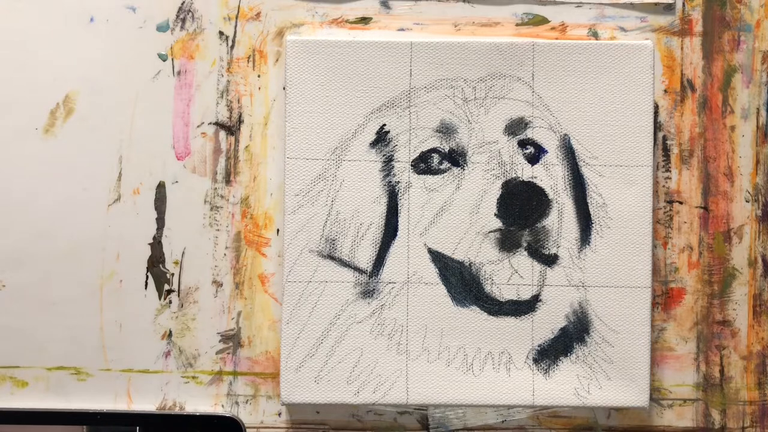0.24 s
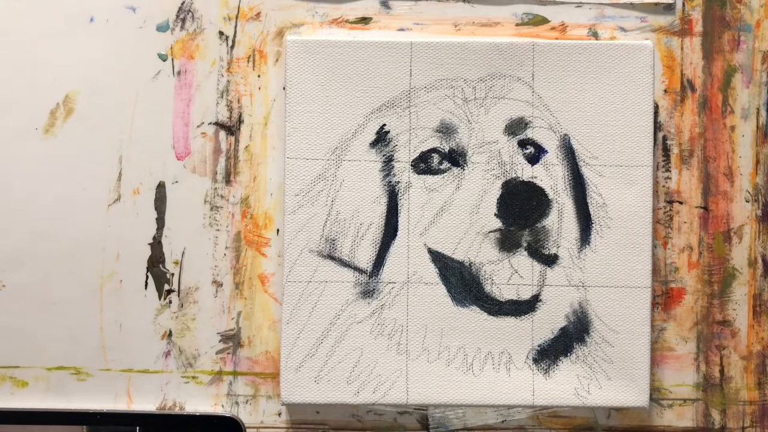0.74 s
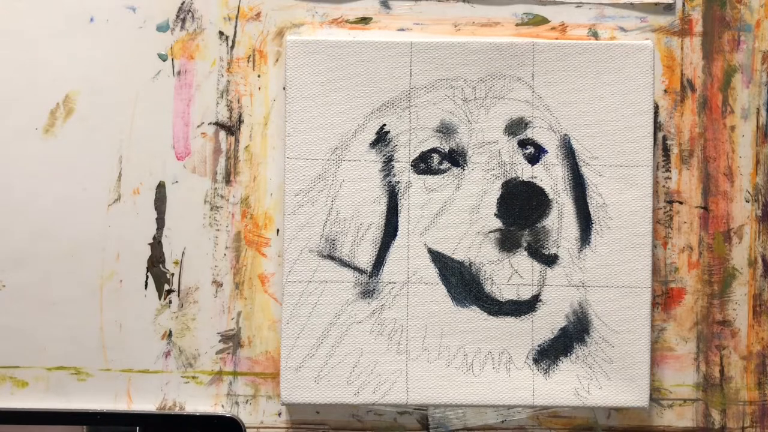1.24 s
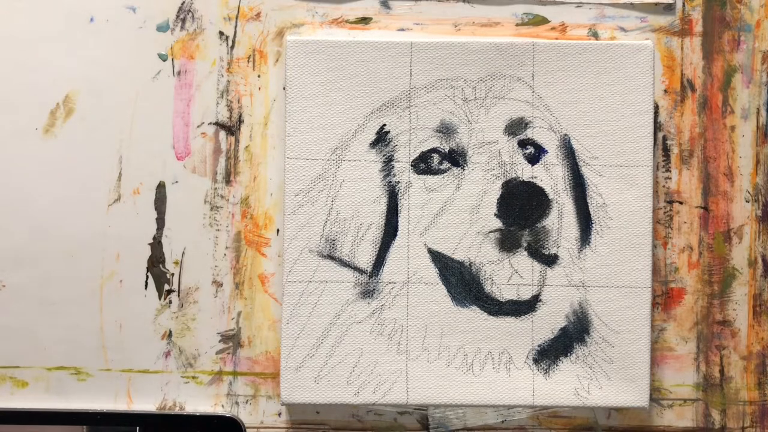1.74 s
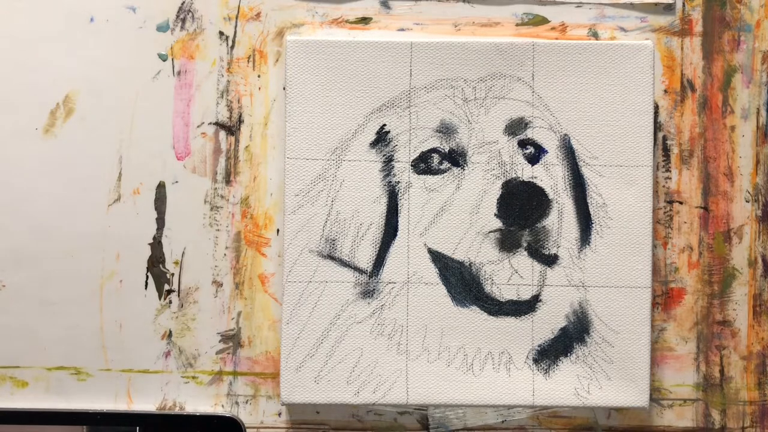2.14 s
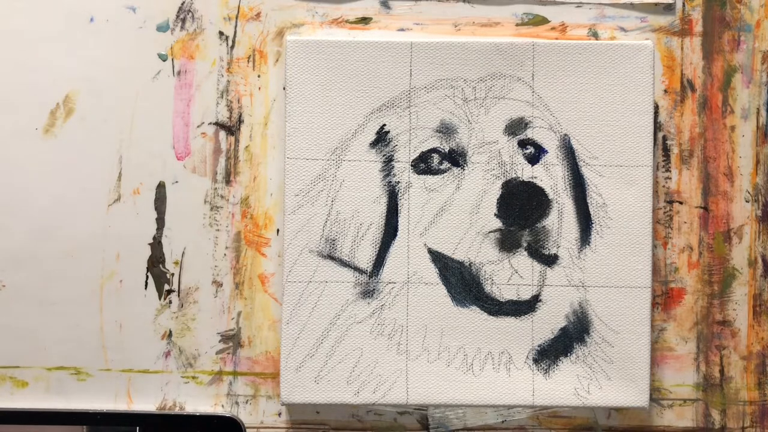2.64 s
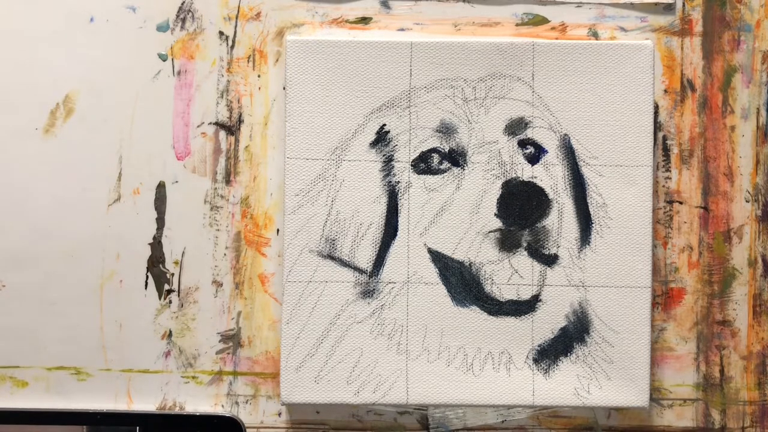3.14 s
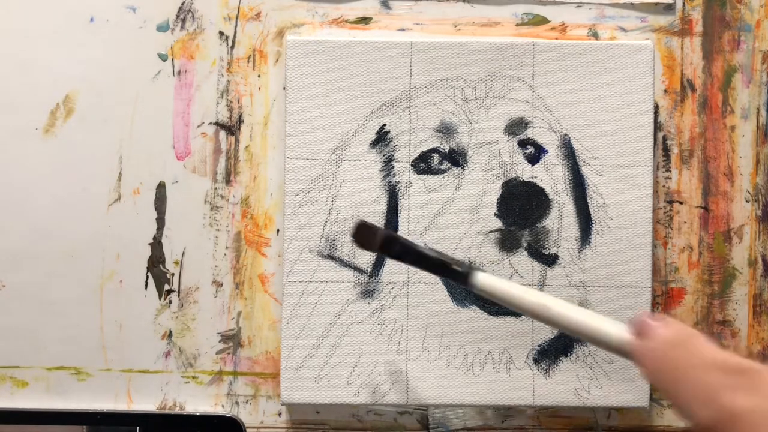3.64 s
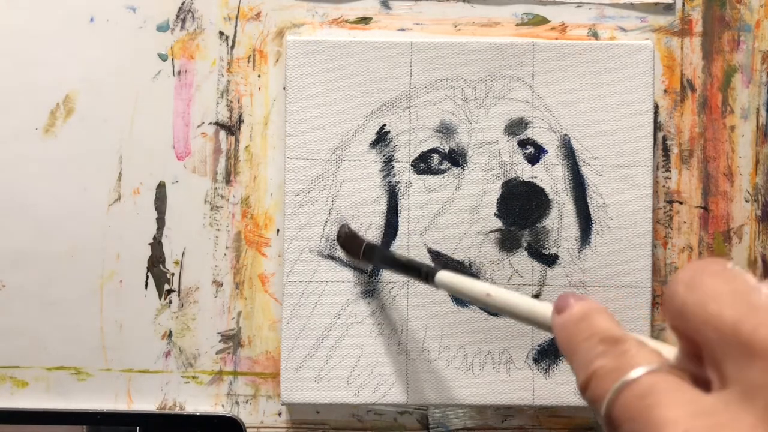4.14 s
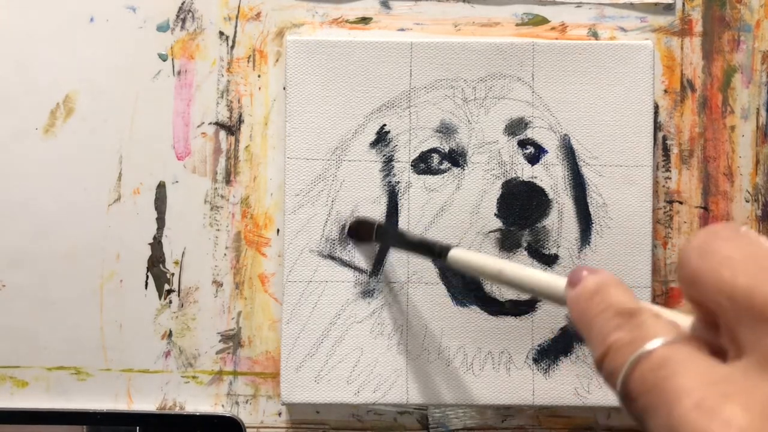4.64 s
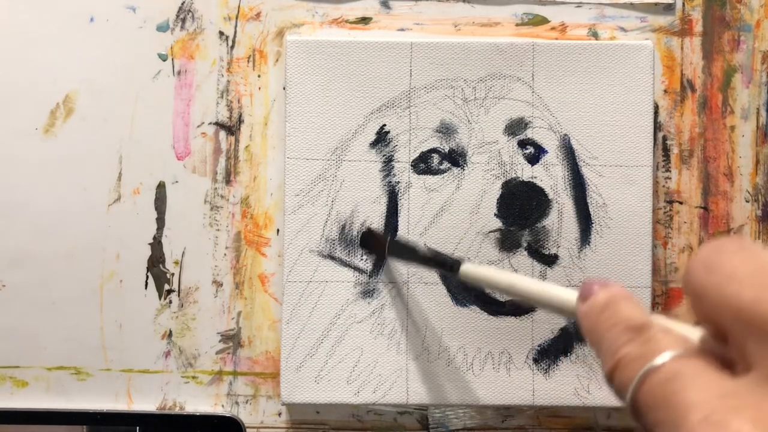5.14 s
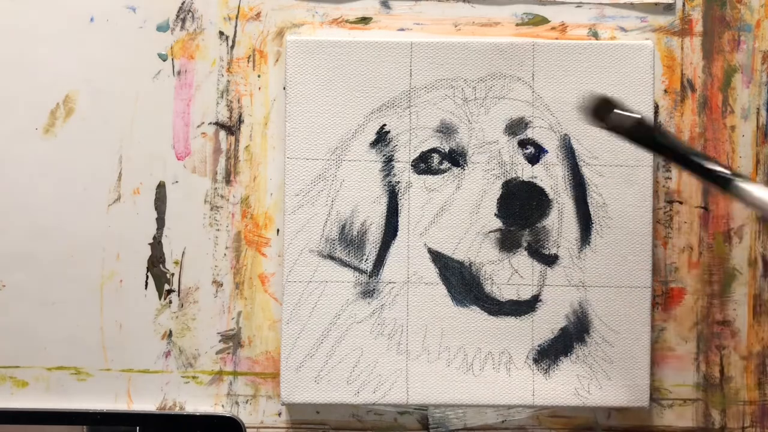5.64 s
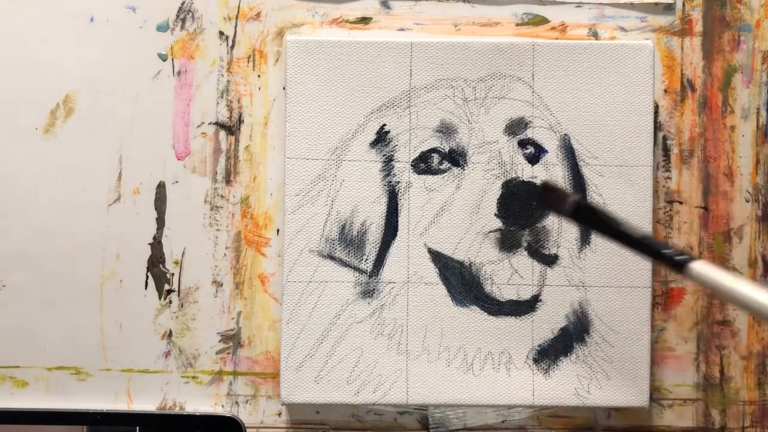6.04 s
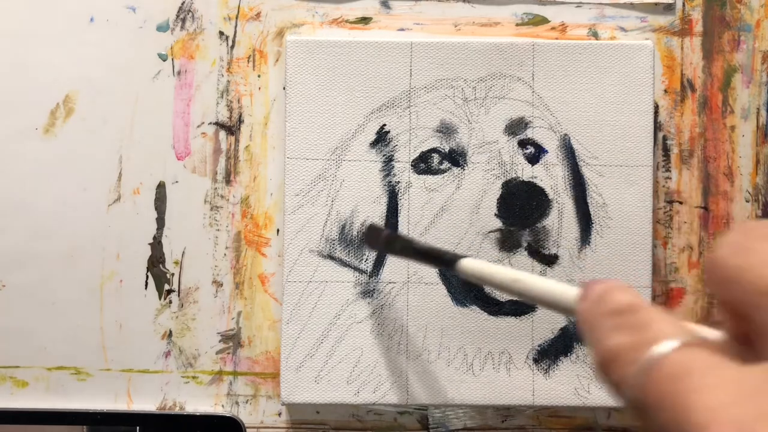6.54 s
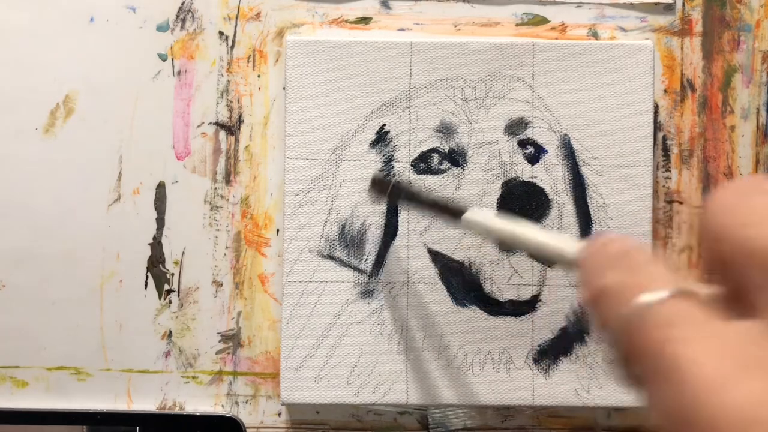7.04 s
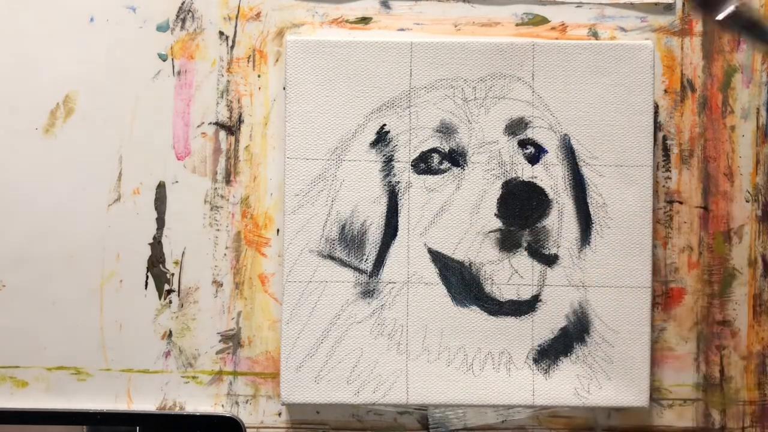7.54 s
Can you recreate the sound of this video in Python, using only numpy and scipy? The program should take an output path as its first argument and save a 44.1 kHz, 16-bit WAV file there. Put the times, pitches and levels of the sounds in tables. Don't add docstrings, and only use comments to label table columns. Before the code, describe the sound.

Wooden knocks and scrapes over a tabletop, then short bristly rasps on taut canvas, in a quiet humming room with a faint ticking clock.

```python
import sys
import numpy as np
from scipy import signal
from scipy.fft import rfft, irfft, next_fast_len
from scipy.io import wavfile
from scipy.ndimage import uniform_filter1d

SR = 44100
rng = np.random.default_rng(int(sys.argv[2]) if len(sys.argv) > 2 else 0)


def boost(x):
    u = np.asarray(x, float) / 20
    return 10 ** u


def pcm_store(signal):
    levels = np.round(np.clip(np.atleast_2d(signal), -1, 1) * 32767)
    wavfile.write(sys.argv[1], SR, levels.astype(np.int16).T)


N = 342745


def unit(x):
    return x / np.sqrt(np.mean(x ** 2))


def shape(x, points):
    hz, db = np.transpose(points)
    size = next_fast_len(len(x))
    log_hz = np.log(np.maximum(np.fft.rfftfreq(size, 1 / SR), 1))
    gain = boost(np.interp(log_hz, np.log(hz), db))
    return irfft(rfft(x, size) * gain, size)[:len(x)]


def ring(x, hz, width_hz):
    return signal.lfilter(*signal.iirpeak(hz, hz / width_hz, SR), x)


def body(x, peaks):
    return sum((-1) ** k * boost(db) * ring(x, hz, width_hz)
               for k, (hz, width_hz, db) in enumerate(peaks))


def patchy(x, peaks, flicker_db, rate_hz):
    out = np.zeros(N)
    for k, (hz, width_hz, db) in enumerate(peaks):
        gain = boost(db + flicker_db * walk(rate_hz))
        out += (-1) ** k * gain * ring(x, hz, width_hz)
    return unit(out)


def walk(rate_hz):
    hold = int(SR / rate_hz)
    steps = np.repeat(rng.standard_normal(N // hold + 1), hold)
    return unit(uniform_filter1d(uniform_filter1d(steps, hold), hold)[:N])


def grit(rate_hz, spread_db):
    hit, size, sign = rng.random((3, N))
    height = boost(-spread_db * np.log(1 - size))
    return unit((hit < rate_hz / SR) * height * (sign - .5))


def add(out, start_s, x):
    i = int(start_s * SR)
    out[i:i + len(x)] += x[:N - i]


def fade(t60_s):
    t = np.arange(int(.4 * SR)) / SR
    return t, np.exp(-np.log(1000) * t / t60_s)


def contact(start_s, length_s, db, change_db, rise_db_per_s, fall_db_per_s):
    out = np.zeros(N)
    rises = rise_db_per_s + 0 * db
    for start, length, level, change, rise in zip(start_s, length_s, db, change_db, rises):
        first = max(int((start - 60 / rise) * SR), 0)
        last = min(int((start + length + 60 / fall_db_per_s) * SR), N)
        i = np.arange(first, last)
        t = i / SR - start
        drift = change * np.clip(t / length, 0, 1)
        onset = rise * np.minimum(t, 0)
        release = -fall_db_per_s * np.maximum(t - length, 0)
        out[i] += boost(level + drift + onset + release)
    return out


def swells(rows, rest_db):
    middle_s, length_s, db = np.transpose(rows)
    slope_db_per_s = 114.5
    start_s = middle_s - length_s / 2
    return boost(rest_db) + contact(start_s, length_s, db, 0 * db, slope_db_per_s, slope_db_per_s)


def taps(events, cycles):
    out = np.zeros(N)
    for start_s, peak_db, hz in events:
        t, decay = fade(cycles / hz)
        soft_start = 1 - np.exp(-t * hz * 4.9)
        add(out, start_s, boost(peak_db + 10) * soft_start * decay * np.sin(2 * np.pi * hz * t))
    return out


def wood(x, hz, narrow_db_per_octave):
    # hz, width_hz, level_db
    modes = [(264, 67, -4.5), (384, 34, -1), (455, 27, -0.5), (545, 20, -2.5), (608, 55, -6.5),
             (694, 41, 0), (740, 59, 0), (874, 72, -4.5), (958, 83, -3.5), (1130, 106, -10), (1300, 49, -6),
             (1407, 100, -10.5), (1670, 147, -11.5), (2370, 500, -8), (4700, 3700, -12)]
    return unit(body(x, [(mode_hz, width_hz, db - narrow_db_per_octave * abs(np.log2(mode_hz / hz)))
                         for mode_hz, width_hz, db in modes]))


def room_air():
    # hz, density_db
    spectrum = [(32, -19), (50, -0.5), (85, -3), (130, -6), (190, -5.5), (260, -14.5), (400, -17),
                (620, -23), (790, -21.5), (1050, -28.5), (2300, -33), (4500, -36), (9000, -38.5),
                (15600, -42)]
    return unit(shape(rng.standard_normal(N), spectrum)) * boost(-63 + walk(2) / 4)


def fridge():
    # middle_s, length_s, level_db
    drone_swells = [(.21, 0.12, -59.5), (.78, 0.081, -63), (1.15, 0.038, -62.5), (1.51, .1, -65.5),
                    (2.08, 0.22, -62), (2.94, 0.27, -65), (3.45, 0.13, -68.5), (4.1, 0.58, -66.5),
                    (4.6, 0.09, -64.5), (5.45, .2, -66), (6.1, 0.29, -66.5), (6.7, .5, -67.5),
                    (7.7, 0.12, -69)]
    # middle_s, length_s, level_db
    buzz_swells = [
        (0.02, 0.068, -67),
        (3.68, 0.23, -69),
        (6.7, 0.24, -66),
    ]
    # pitch_hz, width_hz
    tones = [
        (167.2, 17.5),
        (119.5, 6.7),
    ]
    gains = swells(drone_swells, -87.5), swells(buzz_swells, -74)
    hum = np.zeros(N)
    for gain, (pitch_hz, width_hz) in zip(gains, tones):
        wavering_hz = pitch_hz + 0.2996 * width_hz * walk(6)
        tone = np.sqrt(2) * np.sin(2 * np.pi * np.cumsum(wavering_hz) / SR)
        hum += gain * tone * boost(1.8 * walk(9))
    return boost(-1.5) * hum


def rumble():
    # time_s, level_db
    infra_levels = [(0.0, -49.5), (0.89, -52.5), (1.71, -46), (2.42, -44.5), (2.49, -57), (2.75, -39),
                    (2.83, -47), (3.63, -42.5), (4.46, -57.5), (4.48, -54.5), (7.42, -54.5), (7.77, -54)]
    infra = boost(np.interp(np.arange(N) / SR, *np.transpose(infra_levels)))
    slow = shape(rng.standard_normal(N), [(1.5, -15), (4, 0), (12, -2), (20, -8), (28, -30), (45, -90)])
    bass = boost(-57 + 1.0 * walk(2.5))
    deep = shape(rng.standard_normal(N), [(15, -30), (22, 0), (33, -2), (43, -5), (56, -22), (90, -90)])
    return boost(-2) * infra * unit(slow) + bass * unit(deep)


def scrapes():
    # start_s, length_s, level_db, change_db, hiss_minus_scrape_db
    rows = [(.04, 0.13, -82, -4, -4), (.785, .05, -75.5, -2, -5), (0.98, 0.12, -82, -3, 3.5),
            (1.55, 0.21, -81.5, -3, -2), (1.869, .03, -60, -9, -16), (1.917, 0.054, -64, 4.5, -15),
            (1.964, 0.011, -71.5, 2, -6), (1.994, 0.088, -71.5, -8, -3), (2.237, 0.28, -80, -3.5, 1),
            (2.598, 0.19, -80, 2.5, 0), (2.82, .09, -79, -1, 1.5), (2.945, 0.385, -81.5, 3.5, -2),
            (3.377, 0.079, -74, -2, -5.5), (3.48, 0.5, -83.5, -6, 0), (5.36, .14, -82, 4, -14),
            (6.2, .2, -83, 0, -15), (7.02, 0.2, -82.5, -3, -10)]
    # hz, width_hz, level_db
    edge_modes = [(1350, 320, 3.5), (1920, 440, -1), (2370, 530, -2.5)]
    # hz, density_db
    hiss_spectrum = [(1500, -26), (3000, -5), (4100, 0), (4700, -3), (5300, -3), (7000, -7), (15000, -15)]
    # hz, width_hz, level_db
    squeal_modes = [(4120, 380, -2), (5280, 260, 8), (7440, 430, -6)]
    rise_db_per_s, fall_db_per_s = 600, 402
    start_s, length_s, db, change_db, hiss_db = np.transpose(rows)
    slips = grit(9000, 2.2) * boost(1.2 * walk(40))
    edge = unit(shape(body(slips, edge_modes), [(600, -15), (1100, -2.5), (2600, 0.5), (3100, -14)]))
    hiss = unit(shape(slips, hiss_spectrum))
    squeal = unit(body(slips, squeal_modes))
    out = contact(start_s, length_s, db, change_db, rise_db_per_s, fall_db_per_s) * edge
    out += contact(start_s, length_s, db + hiss_db, change_db, rise_db_per_s, fall_db_per_s) * hiss
    out += contact([1.972], [.008], np.array([-65.5]), [0], 420., 330.) * squeal
    return out


def clicks():
    # start_s, peak_db, pitch_hz
    rows = [
        (0.4206, -64.5, 3300),
        (0.702, -59, 3400),
        (1.0263, -72, 2690),
    ]
    return taps(rows, 16.0)


def clock():
    step_levels = [-65.5, -63, -62.5, -63.5, -61.5, -63, -63.5, -64.5]
    # hz, width_hz, level_db
    case_modes = [(1270, 137, 6), (1700, 170, 3.5), (2500, 300, 3.5), (2940, 160, 4.5), (3560, 350, 3.5),
                  (4780, 850, -0.5), (6400, 3200, -5.5), (9900, 5400, -11.5)]
    first_s, tooth_s = .548, .0105
    out = np.zeros(N)
    tooth = np.arange(-4, 8)
    tooth_db = np.where(tooth < 0, -3 + 0.9 * tooth, 4.5 - 2 * tooth)
    for beat, db in enumerate(step_levels):
        for k, part_db in zip(tooth, tooth_db):
            t, decay = fade(0.062)
            rattle = (1 - np.exp(-t / 0.0065)) * decay * rng.standard_normal(len(t))
            level_db = db + part_db + 1.3 * rng.standard_normal()
            add(out, first_s + beat + k * tooth_s, boost(level_db) * rattle)
    return boost(9) * body(out, case_modes)


def brush():
    # start_s, length_s, pressure_db, change_db, drum_minus_tips_db
    strokes = [(.855, 0.011, -73.5, 1.5, -3), (4.058, 0.09, -79, -1, 11), (4.268, 0.045, -68.5, -0.5, -0.5),
               (4.395, 0.069, -70.5, -0.5, 3.5), (4.573, 0.048, -72.5, 1, 3), (4.7, 0.036, -70.5, -4, 7),
               (4.82, 0.041, -72, 0, 6), (4.928, 0.029, -67, -2.5, 4), (5.06, .03, -70.5, -6.5, 3),
               (5.153, 0.033, -73, -2, 7), (5.279, 0.045, -71.5, 0.5, 1.5), (6.803, 0.13, -68, -6.5, 2.5)]
    # hz, density_db
    bristle_spectrum = [(2500, -44), (4000, -13), (5400, -3.5), (7000, -4.5), (8500, -6), (10000, -1.5),
                        (12000, -7), (14500, -5.5), (16000, -17)]
    # hz, width_hz, level_db
    weave_modes = [(2280, 290, -3), (2950, 410, -1), (3600, 590, -3.5), (4700, 290, -2)]
    # hz, width_hz, level_db
    canvas_modes = [(790, 220, -1), (1010, 200, 2), (1200, 190, 0), (1430, 200, -5.5), (1780, 1100, -15)]
    start_s, length_s, db, change_db, drum_db = np.transpose(strokes)
    rise_db_per_s = 750 * boost(-0.5 * change_db)
    tips = contact(start_s, length_s, db, change_db, rise_db_per_s, 450)
    rasp = contact(start_s, length_s, db, 0.19 * change_db, rise_db_per_s, 400)
    drum = contact(start_s - 0.0057, length_s, db + drum_db, change_db, rise_db_per_s, 280)
    slips = grit(14000, 0.57) * boost(1.4 * walk(60))
    cloth = grit(4000, 2.2) * boost(0.43 * walk(45))
    weave = body(patchy(slips, weave_modes, 1.7, 30), [(3350, 2800, 0)])
    out = tips * unit(shape(slips, bristle_spectrum))
    out += boost(-0.2) * rasp * unit(weave)
    out += boost(-0.5) * drum * patchy(cloth, canvas_modes, 1.0, 25)
    return out


def snaps():
    # start_s, peak_db, pitch_hz
    rows = [
        (1.392, -64, 600),
        (2.02, -49, 165),
        (2.095, -44, 150),
        (2.11, -46, 113),
        (2.914, -50.5, 510),
        (3.4, -49.5, 76),
        (5.4885, -61, 2000),
    ]
    return taps(rows, 3.4)


def drags():
    # start_s, length_s, rub_db, change_db, pitch_hz
    rows = [(1.515, 0.2, -64, 5, 493), (1.891, 0.066, -60, 8, 720), (2.03, 0.037, -62, 5, 700),
            (2.61, 0.024, -66, 0.5, 760), (2.786, .1, -77, -10, 576), (2.924, .1, -64, -13, 484),
            (3.197, 0.075, -69, -6, 580), (3.373, 0.11, -73.5, 6, 695), (3.597, 0.12, -62.5, -4.5, 594),
            (6.12, 0.14, -73, -9, 420), (7.05, .14, -86, 0, 455)]
    rub = shape(grit(2500, 1.5) * boost(2.0 * walk(45)), [(200, 3.5), (1100, -8), (2500, -21)])
    out = np.zeros(N)
    for row in np.array(rows):
        gain = contact(*row[:4, None], 400, 312)
        out += boost(-3.5) * gain * wood(rub, row[4], 15.7)
    return out


def knocks():
    # start_s, peak_db, pitch_hz, crack_minus_peak_db,
    # table_minus_peak_db
    blows = [(1.768, -32.5, 827, -24, -11), (1.99, -36, 700, -26, -9.5), (2.014, -38.5, 694, -27, -18),
             (2.092, -26.5, 1275, -12.5, -7.5), (2.107, -23, 720, -44, -14),
             (2.124, -25.5, 693, -31, -13.5), (2.193, -41, 770, -16, -8.5), (2.755, -46, 800, -14, -7.5),
             (3.13, -52.5, 548, -10, -9.5), (3.149, -48, 650, -14, -16), (3.179, -46.5, 740, -17, -17.5),
             (3.208, -54, 686, -17, -7), (3.249, -54.5, 684, -19, -6), (3.588, -54, 630, -12, -20),
             (3.633, -53.5, 585, -17, -14),
             (1.859, -40, 1410, -15.5, -14),
        (1.86, -39.5, 760, -30, -16),
    ]
    delay_s = .0008
    out = np.zeros(N)
    for start_s, peak_db, hz, crack_db, table_db in blows:
        t, note_decay = fade(0.024)
        shake, snap = rng.standard_normal((2, len(t)))
        late = np.maximum(t - delay_s, 0)
        note = (1 - np.exp(-late / 0.0003)) * note_decay * np.sin(2 * np.pi * hz * late)
        shake = shape(shake, [(300, 1.0), (1400, 1), (2200, -9), (8000, -15), (16000, -13)])
        answer = (1 - np.exp(-t / 0.0041)) * fade(0.2)[1] * wood(shake, 0.75 * hz, 5.4)
        snap = shape(snap, [(1000, -39), (2200, 0), (6000, 0.0), (15000, -27)])
        crack = (t > delay_s) * fade(0.015)[1] * snap
        blow = 1.21 * note + boost(table_db) * answer + boost(crack_db + 2.5) * crack
        add(out, start_s, boost(peak_db) * blow)
    return out


def landings():
    # start_s, peak_db, pitch_hz
    rows = [
        (4.257, -61.5, 1130),
        (4.69, -74, 1230),
        (4.921, -74, 1200),
        (6.716, -71, 1100),
    ]
    return taps(rows, 30.0)


def bumps():
    # start_s, peak_db, pitch_hz
    rows = [
        (7.182, -57, 224),
        (7.249, -57.5, 210),
        (7.342, -70, 190),
        (7.433, -63, 212),
        (7.546, -61, 250),
        (7.611, -66.5, 196),
        (7.668, -62, 199),
        (7.709, -59, 240),
    ]
    return taps(rows, 14.7)


def room(x):
    # band_hz, t60_s
    decays = [(250, 0.36), (1000, 0.24), (4000, 0.27), (12000, 0.27)]
    t = np.arange(int(.6 * SR)) / SR
    tail = np.zeros(len(t))
    for hz, t60_s in decays:
        tail += ring(rng.standard_normal(len(t)), hz, 1.86 * hz) * np.exp(-np.log(1000) * t / t60_s)
    tail *= np.clip((t - .004) / 0.011, 0, 1)
    return signal.fftconvolve(x, tail / np.sqrt(np.sum(tail ** 2)))[:N]


def scene():
    near = clicks() + brush() + snaps() + landings() + bumps()
    table = scrapes() + drags() + knocks()
    far = clock()
    wet = room(boost(-9.5) * near + boost(-12) * table + boost(-4.5) * far)
    background = room_air() + fridge() + rumble()
    return (near + table + boost(0.5) * far + wet + background)[None]


def band_limit(x):
    return signal.sosfilt(signal.butter(12, 16390, fs=SR, output="sos"), x)


def record(dry):
    top_hz = 15780
    low_pass = signal.ellip(10, .2, 60, top_hz, fs=SR, output="sos")
    mix = signal.sosfilt(low_pass, dry)
    return band_limit(mix)


dry = scene()
out = record(dry)
pcm_store(out)
```